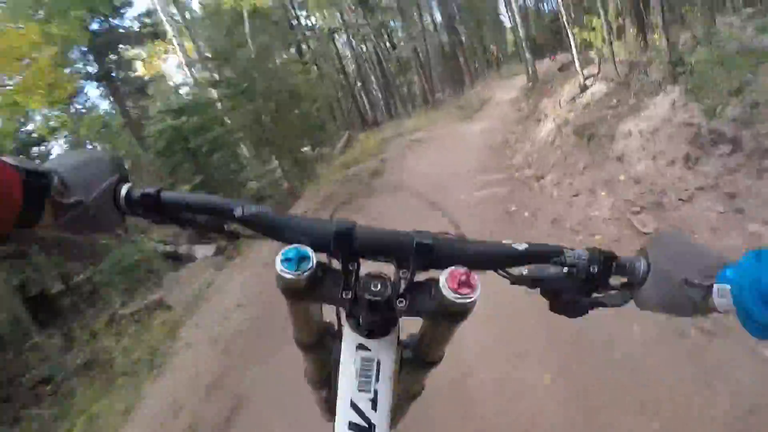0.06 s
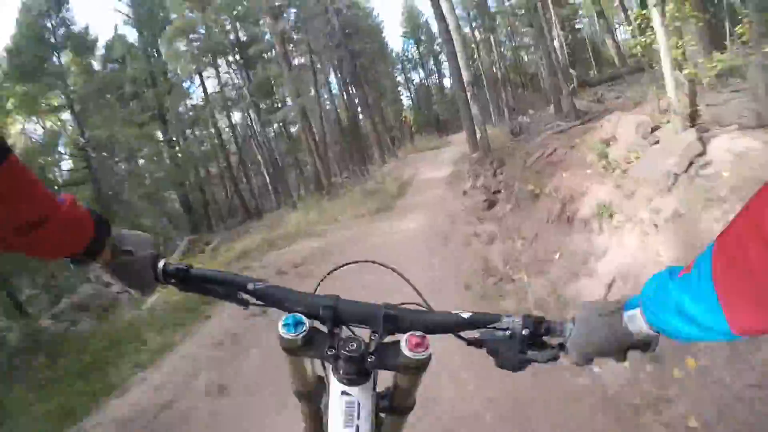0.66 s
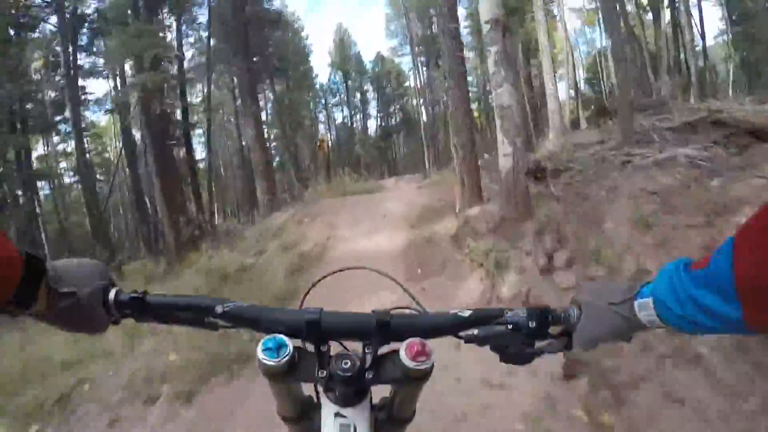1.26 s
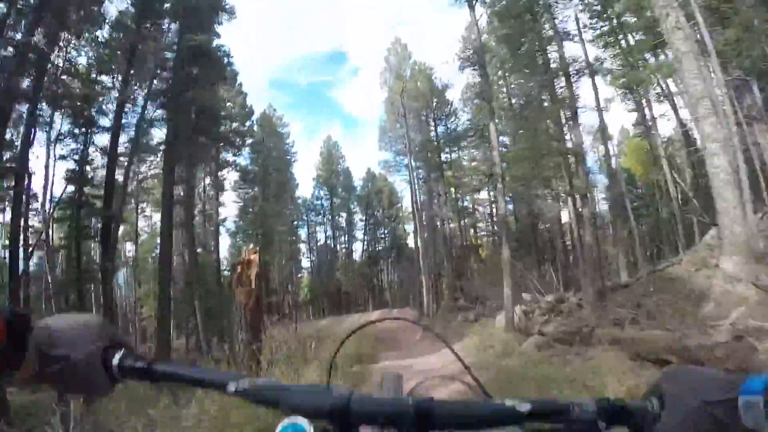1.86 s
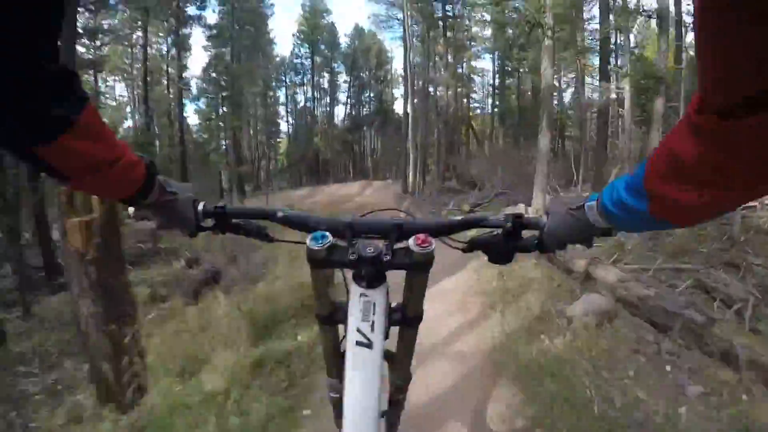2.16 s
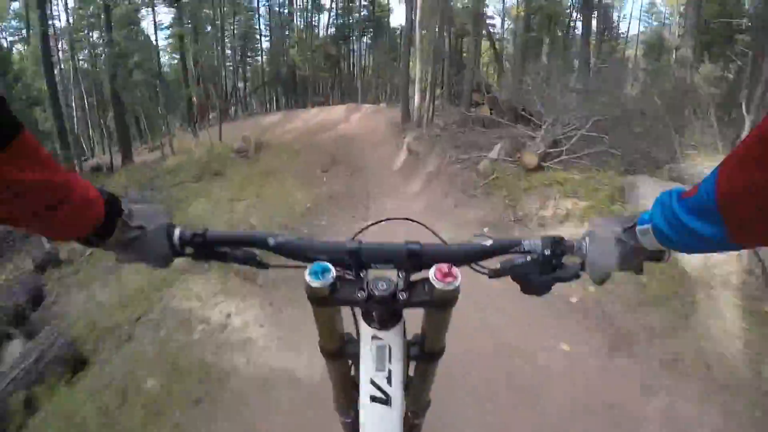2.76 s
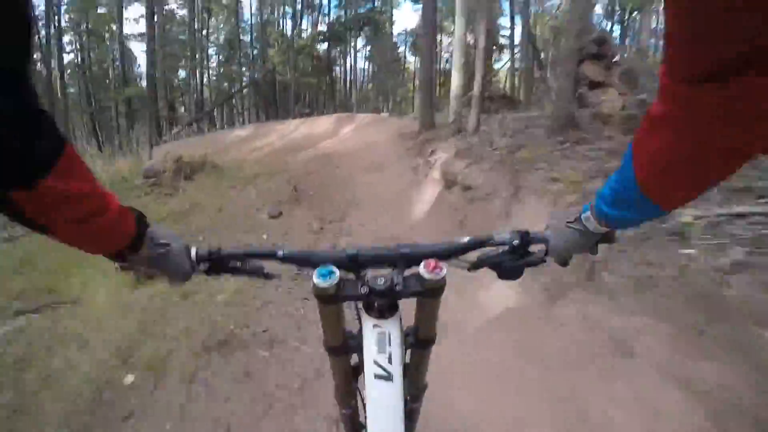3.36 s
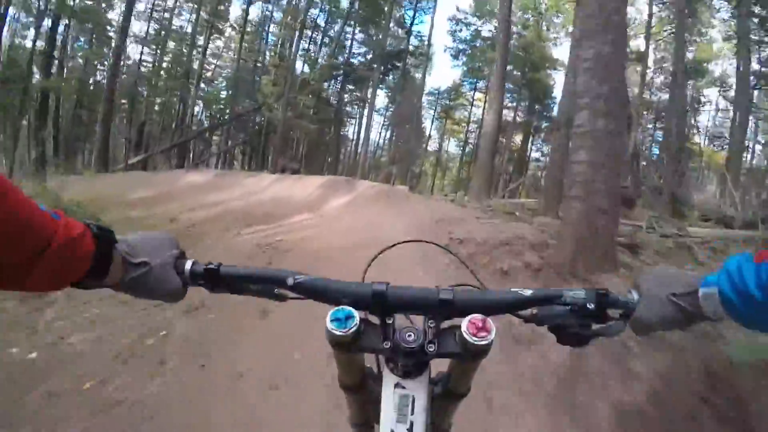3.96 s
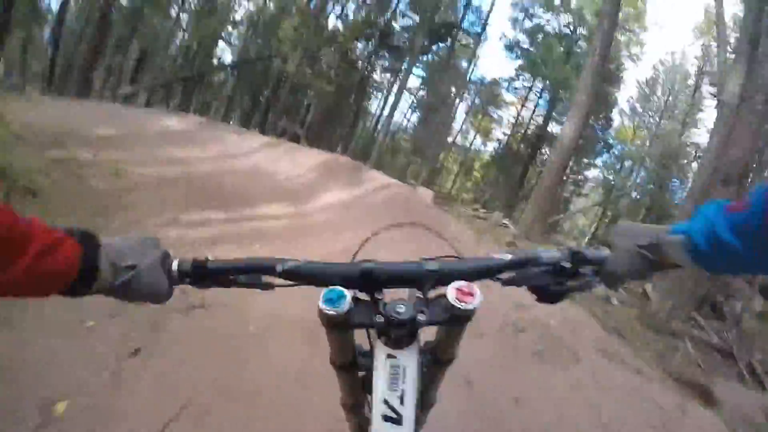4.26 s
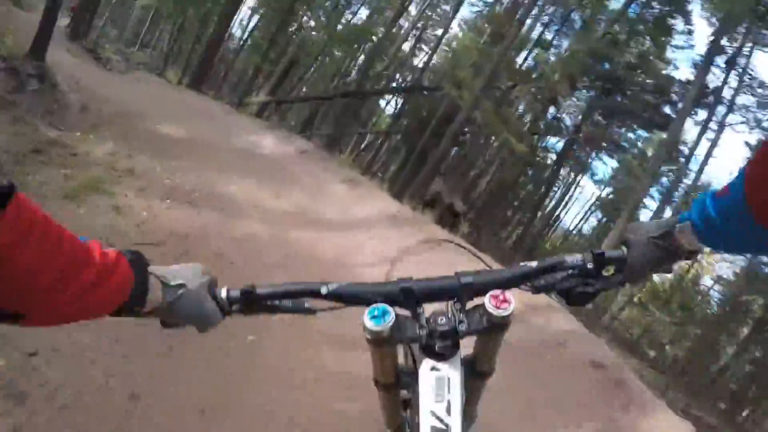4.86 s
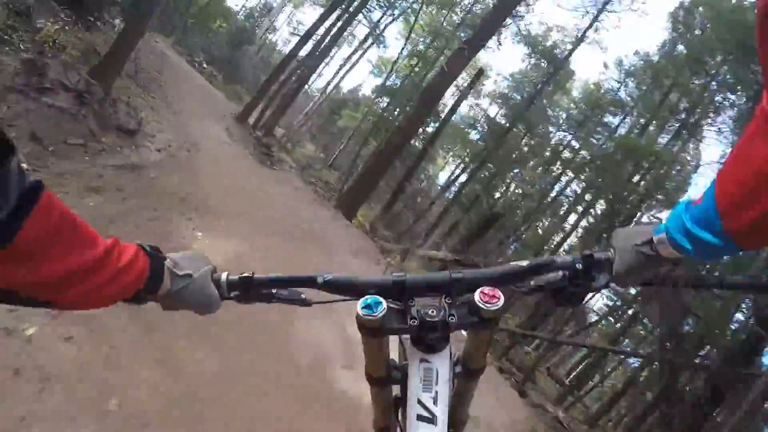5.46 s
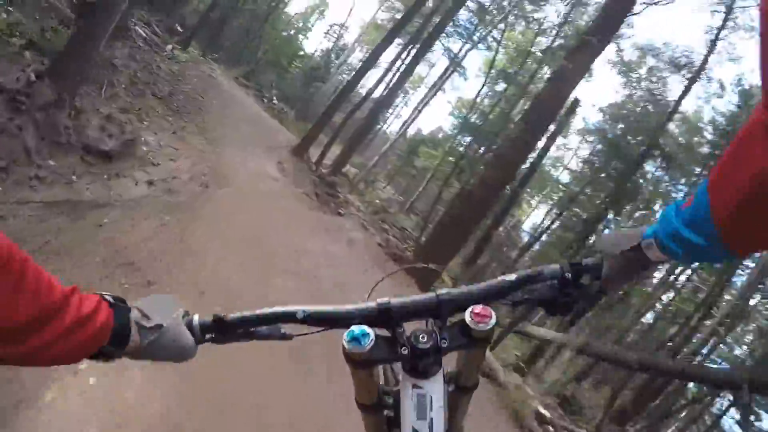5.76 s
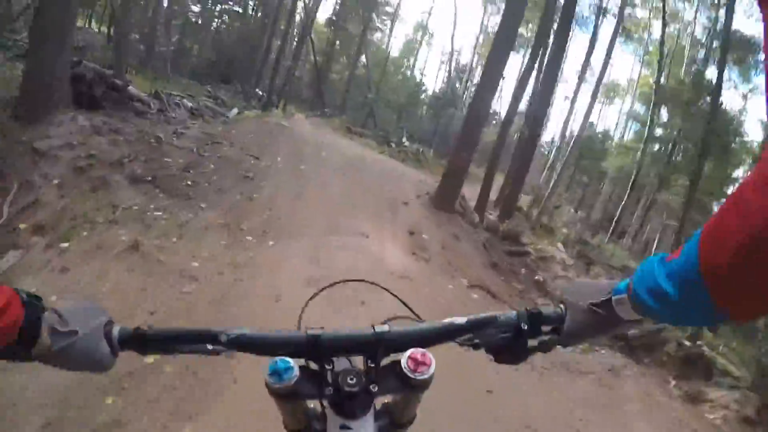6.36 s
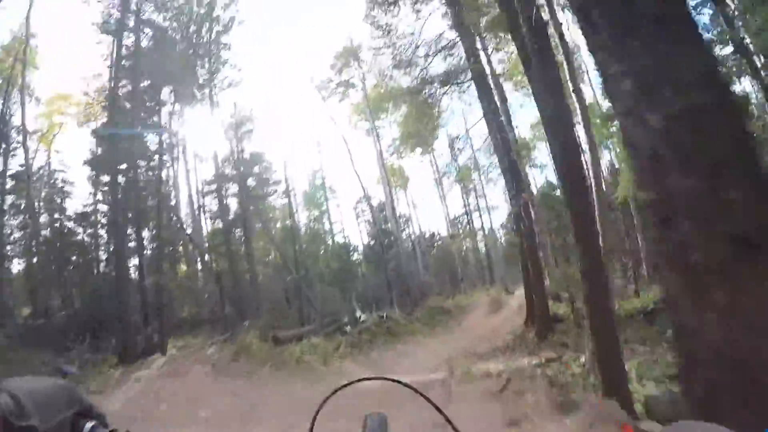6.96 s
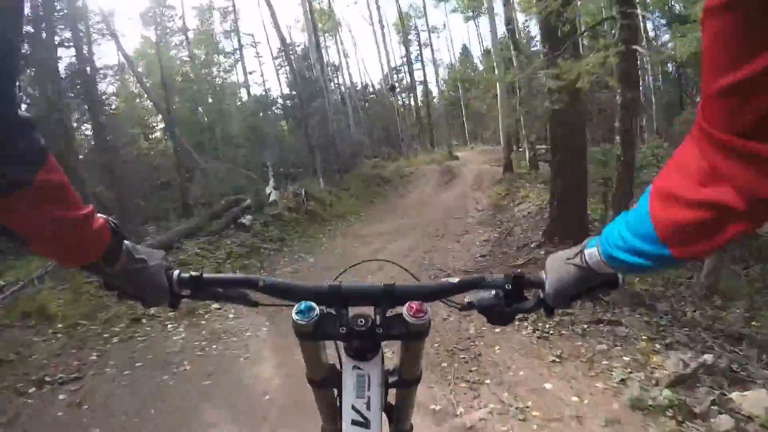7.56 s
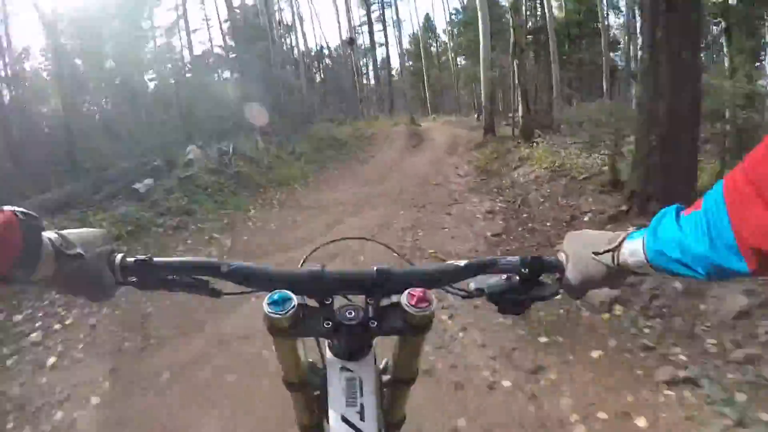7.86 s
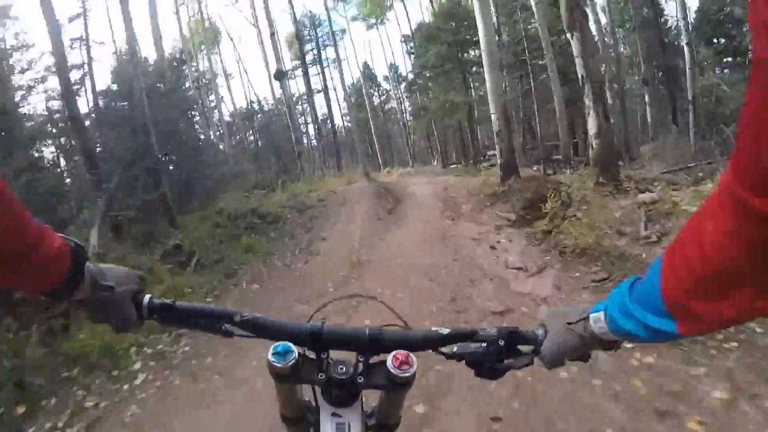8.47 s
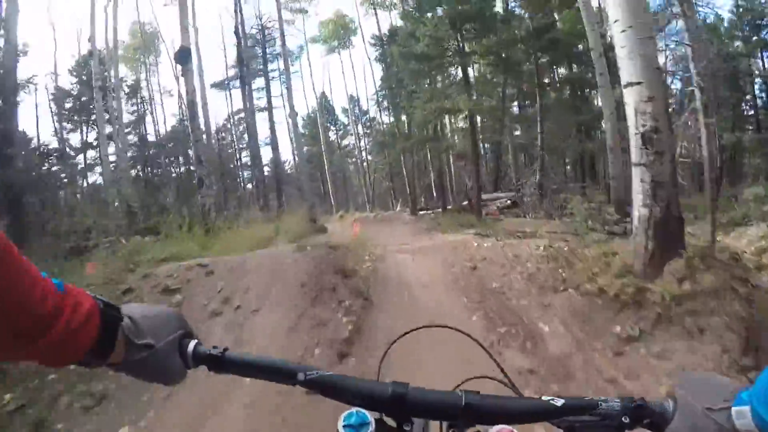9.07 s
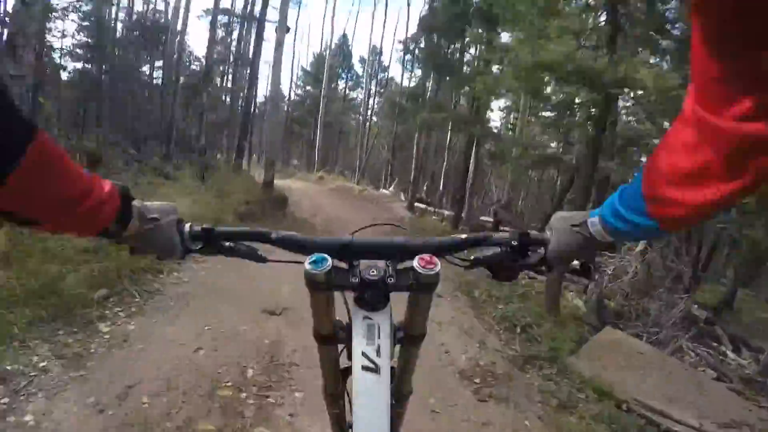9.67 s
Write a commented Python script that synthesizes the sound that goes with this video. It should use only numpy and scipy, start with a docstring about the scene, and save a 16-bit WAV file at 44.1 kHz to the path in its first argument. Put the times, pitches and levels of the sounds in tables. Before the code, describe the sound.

Low wind rumble buffets a chest-worn microphone while bike tyres roll over packed dirt and sand. Chain slaps and flicked stones come thickly at first. After a short airborne lull, a loud knock and thud hit, followed a couple of seconds later by another sharp crack. The gritty rolling carries on with scattered clacks, soft thuds and one more quiet jump and landing.

```python
"""Mountain bike on a dirt trail, from a chest camera.

Tyres crunch over grit and fall quiet in the jumps; wind and body shake rumble in the bass.
Chain and cables clack, stones tick and wheels knock over soft low thuds and swells of rumble.
Two hard blows ring the camera case and overload the camera."""
import sys
import numpy as np
from scipy import signal
from scipy.fft import rfft, irfft, next_fast_len
from scipy.io import wavfile
from scipy.ndimage import uniform_filter1d

SR = 44100
rng = np.random.default_rng(int(sys.argv[2]) if len(sys.argv) > 2 else 0)


def master_out(mix):
    """Clip the mix to full scale and print it as 16-bit PCM to the path in sys.argv[1]."""
    frames = np.transpose(np.atleast_2d(mix))
    ceiling = np.clip(frames, -1, 1)
    pcm = np.round(ceiling * 32767).astype(np.int16)
    wavfile.write(sys.argv[1], SR, pcm)


N = 428652
T = np.arange(N) / SR
AGE = np.arange(SR // 5) / SR  # s since a blow

# ground under the tyres: t/s, grit/dB, sand/dB
GROUND = [(0, -37.5, -44), (.22, -49.5, -62.5), (.6, -46.5, -61), (1.04, -44, -49.5), (1.27, -47, -59.5),
          (1.85, -50.5, -65.5), (2.6, -47, -60), (3.12, -49.5, -66), (3.52, -41.5, -51), (3.85, -50.5, -67),
          (4.2, -48, -56.5), (4.37, -49.5, -67), (4.7, -49.5, -63), (5.07, -43, -56.5), (5.28, -54, -69),
          (5.85, -53.5, -65), (6.15, -49, -62.5), (6.7, -50, -67), (7.25, -54, -71), (7.85, -47, -65),
          (8.1, -48, -65), (8.65, -52.5, -63.5), (9.35, -55, -79), (9.72, -47.5, -64)]
# tyres bite at a bump or turn: t/s, length/s, crunch/dB, roll/dB
BITES = [(0, .1, -43.5, -50), (0.34, 0.057, -45.5, -54.5), (0.454, 0.028, -36, -46),
         (0.746, 0.042, -40, -44.5), (0.87, 0.21, -42.5, -51.5), (1.456, 0.052, -42, -47),
         (1.698, 0.042, -39, -44.5), (1.89, 0.088, -43.5, -53.5), (2.001, 0.086, -45.5, -53),
         (2.398, 0.18, -42.5, -56), (2.56, 0.15, -41, -52), (2.764, 0.064, -44.5, -50.5),
         (2.983, 0.063, -45.5, -49), (3.18, 0.066, -41.5, -51), (3.442, .12, -40, -50),
         (3.644, 0.058, -39, -47.5), (3.9, .08, -47.5, -57), (4.16, 0.14, -40, -49.5),
         (4.43, .07, -40.5, -52.5), (4.556, 0.056, -43.5, -56), (4.727, 0.07, -43.5, -49.5),
         (5.34, 0.037, -44, -55.5), (5.477, 0.058, -46.5, -61), (5.976, 0.068, -45.5, -59),
         (6.21, 0.1, -48, -57.5), (6.623, 0.06, -46.5, -57), (6.83, 0.14, -41.5, -50.5),
         (7.089, 0.046, -47.5, -55), (7.171, 0.19, -51, -58), (7.736, .1, -40, -49.5),
         (8.24, .06, -46, -52), (8.524, 0.089, -44, -53.5), (8.679, 0.088, -47, -59),
         (9.275, .07, -43.5, -51), (9.404, 0.034, -45, -51.5)]
# spectra of hollow roll, grit and sand: f/Hz, level/dB
ROLL_SPECTRUM = [(120, -2.5), (260, -6), (470, -8.5), (640, 3), (850, 1), (1100, 6.5), (1350, 2),
                 (2200, -15)]
GRIT_SPECTRUM = [(600, -10.5), (1300, -15.5), (1750, -2), (2050, 0), (2480, -1.5), (2900, 0), (3400, -5),
                 (4000, -15), (4900, -21.5), (6500, -25.5)]
SAND_SPECTRUM = [(2500, -22), (4200, 4.5), (5200, -14.5), (6200, -9.5), (7000, -22.5), (9000, -15.5),
                 (12000, -17.5), (15000, -20.5)]
ROLL_DB, USUAL_GRIT_DB = -58, -45
FLUTTER_DB, FLUTTER_HZ = 2.08, 60


def tyres(jump_gain):
    """Knobs drum on packed dirt, crush grit and spray sand, fluttering with the wheel load."""
    grit, sand = gains(GROUND)
    crunch = grit * jump_gain
    roll = undb(ROLL_DB) * np.sqrt(grit / undb(USUAL_GRIT_DB)) * jump_gain
    for t, length_s, crunch_db, roll_db in BITES:
        bite = gate(t, t + length_s, attack_s=.037, release_s=.042)
        crunch = np.maximum(crunch, undb(crunch_db) * bite)
        roll = np.maximum(roll, undb(roll_db) * bite)
    sand = np.hypot(sand * jump_gain, undb(-25.5) * crunch)
    load = undb(FLUTTER_DB * drift(FLUTTER_HZ))
    drumming = unit(colour(grains(per_s=750, spread_db=2.5, smear_s=.0016), ROLL_SPECTRUM))
    crushing = unit(colour(grains(per_s=900, spread_db=3.5, smear_s=.004), GRIT_SPECTRUM))
    spray = undb(-1) * unit(colour(grains(per_s=910, spread_db=3.5, smear_s=.0018), SAND_SPECTRUM))
    pebbles = undb(-1.5) * unit(band(grains(per_s=45, spread_db=2.5, smear_s=.0011), 3700, octaves=1.1))
    return load * (roll * drumming + crunch * crushing + sand * spray) + sand * pebbles


# jumps and crests: take-off/s, landing/s, tyre gain/dB, buffet gain/dB
AIRTIME = [(2.095, 2.41, -8.5, -15.5), (2.696, 2.969, -5.5, -11.5), (7.31, 7.674, -7.5, -12.5),
           (8.867, 9.244, -2, 0.5)]
LIFT_S = .079


def jumps():
    """Gains of tyre noise and wind buffeting as the wheels unload and land."""
    tyre_db, buffet_db = 0, 0
    for takeoff_s, landing_s, tyre_step_db, buffet_step_db in AIRTIME:
        aloft = gate(takeoff_s, landing_s, LIFT_S, LIFT_S)
        tyre_db += tyre_step_db * aloft
        buffet_db += buffet_step_db * aloft
    return undb(tyre_db), undb(buffet_db)


# rush of air: t/s, level/dB
AIRFLOW = [(0, -17), (.25, -28.5), (.58, -17), (1.2, -18.5), (1.68, -21), (1.9, -27), (2.5, -21.5),
           (3.05, -27), (3.5, -17), (3.76, -20), (3.92, -33.5), (4.22, -18.5), (4.6, -23.5), (4.88, -15),
           (5.25, -18.5), (5.85, -21.5), (6.38, -30.5), (6.8, -20), (7.15, -26.5), (7.6, -29.5),
           (7.88, -16.5), (8.15, -27.5), (8.7, -24.5), (9.6, -35)]
# bumps shaking the rider: t/s, level/dB
BUMPS = [(0.059, -33), (0.169, -43), (0.491, -33), (0.552, -29), (.73, -35.5), (0.832, -29.5), (1.0, -28.5),
         (1.14, -41), (1.23, -52), (1.33, -44), (1.422, -28), (1.49, -35), (1.91, -38), (2.439, -29),
         (3.02, -37.5), (3.182, -29), (3.361, -33.5), (3.52, -40), (3.632, -31), (4.17, -34),
         (4.269, -27.5), (4.55, -35), (4.719, -32), (4.87, -32), (5.05, -35), (5.13, -30.5), (5.37, -51),
         (5.47, -36), (5.979, -34.5), (6.22, -37), (6.68, -41), (6.97, -40), (7.752, -23.5), (7.94, -43),
         (8.28, -36), (8.41, -54), (8.55, -36), (8.63, -33), (8.981, -36), (9.69, -30.5)]
# spectra of rumble and shudder: f/Hz, level/dB
RUMBLE_SPECTRUM = [(6, -32.5), (12, -5), (22, 10.5), (30, 4), (38, -5.5), (50, -9.5), (75, -27), (110, -48)]
SHUDDER_SPECTRUM = [(35, -14), (62, 3.5), (85, -1.5), (125, -10), (170, -19), (260, -26.5), (420, -35.5)]
BUMP_ATTACK_S, BUMP_DECAY_S, HEAVE_DB = .016, .032, 15
SHUDDER_DB, USUAL_AIR_DB = -47, -22.5
GUST_DB, GUST_HZ = 2, 14


def wind_and_shake(jump_gain):
    """Gusty air buffets the camera; each bump adds a shudder and a slow heave."""
    air, = gains(AIRFLOW)
    jolt = np.minimum(AGE / BUMP_ATTACK_S, 1) * np.exp(-AGE / BUMP_DECAY_S)
    shake = np.zeros(N)
    for t, db in BUMPS:
        add(shake, t, jolt, db)
    buffet = jump_gain * undb(GUST_DB * drift(GUST_HZ))
    rumble = np.hypot(air * buffet, undb(HEAVE_DB) * shake) * eddies(RUMBLE_SPECTRUM, hold_s=.06)
    tremor = undb(SHUDDER_DB) * np.sqrt(air / undb(USUAL_AIR_DB)) * buffet ** .2
    shudder = np.hypot(tremor, shake) * eddies(SHUDDER_SPECTRUM, hold_s=.05)
    return undb(3.2) * rumble + undb(1) * shudder


# slaps on the frame: t/s, level/dB, f/Hz
CHAIN_SLAPS = [(0.0558, -18, 2760), (0.3272, -20, 2060), (0.711, -22.5, 2110), (0.761, -21.5, 1940),
               (0.8582, -27, 2710), (0.8752, -16, 2350), (0.9422, -22.5, 2270), (0.9971, -16.5, 2860),
               (1.0588, -12.5, 2400), (1.1127, -19.5, 2460), (1.436, -4, 2180), (1.47, -19, 1900),
               (1.5904, -28.5, 2340), (1.707, -28, 1900), (2.4306, -18.5, 2330), (2.5028, -19.5, 2040),
               (3.5053, -10.5, 2400), (3.5746, -16.5, 2110), (3.646, -19.5, 2000), (4.9721, -26.5, 2290),
               (6.2658, -15.5, 2180), (6.9378, -25.5, 2400), (7.7175, -24.5, 2260), (7.992, -20, 2170),
               (8.0717, -23, 2350), (8.3552, -23.5, 2310)]


def chain():
    """Chain and cables slap the frame; the camera case rings faintly."""
    out = np.zeros(N)
    for t, db, hz in CHAIN_SLAPS:
        force = contact(decay_s=.0013, tail_db=-27, tail_s=.0044)
        slap = band(force, 1.005 * hz, octaves=.68) + undb(-37) * force
        clack = band(slap, 2900, octaves=2.2, order=1)
        add(out, t, case_ring(clack, ring_db=-38), db)
    return out


# flicked stones: t/s, level/dB, f/Hz
STONE_TICKS = [(0.099, -33, 2880), (0.233, -31.5, 2560), (0.3747, -24.5, 3440), (0.3876, -23.5, 2870),
               (0.5594, -24, 2640), (0.5916, -28, 3030), (0.627, -25.5, 2630), (0.6707, -29, 2920),
               (0.746, -25.5, 2630), (0.9087, -22, 3130), (1.0273, -25, 2780), (2.406, -33, 3560),
               (2.416, -31.5, 4500), (2.4508, -24, 3200), (2.4692, -24.5, 2620), (2.4837, -24.5, 3430),
               (2.735, -36, 2550), (2.8377, -36.5, 2820), (3.4212, -28.5, 2600), (3.5285, -25.5, 3470),
               (4.578, -31.5, 3400), (4.911, -30.5, 2800), (5.521, -32, 3200), (6.7165, -37.5, 3200),
               (7.722, -35, 4130), (7.805, -33.5, 3250), (8.0457, -29, 2450), (8.4457, -30.5, 2410),
               (8.6847, -24, 2700), (8.726, -27.5, 2730)]


def stones():
    """Stones tick as the tyres flick them away."""
    out = np.zeros(N)
    for t, db, hz in STONE_TICKS:
        force = contact(decay_s=.0044, tail_db=-22, tail_s=.012)
        tick = band(force, hz, octaves=.72, order=1)
        add(out, t, band(tick, 2500, octaves=1.25, order=1), db)
    return out


# wheel and frame knocks: t/s, level/dB, f/Hz
WHEEL_KNOCKS = [(1.005, -36, 780), (1.48, -29, 626), (2.513, -28, 647), (2.570, -16, 950),
                (2.5766, -2, 1515), (2.602, -26.5, 805), (2.633, -27, 1010), (2.669, -31.5, 640),
                (3.449, -33, 650), (4.248, -11.5, 704), (4.561, -45, 450), (4.717, -34.5, 555),
                (4.832, -31, 1000), (5.1402, -12.5, 890), (5.947, -30, 840), (6.263, -23, 1080),
                (6.936, -29.5, 970), (7.758, -36, 500)]


def wheels():
    """Wheels and frame knock dully; the camera case rings faintly."""
    out = np.zeros(N)
    for t, db, hz in WHEEL_KNOCKS:
        force = contact(decay_s=.0015, tail_db=-30.5, tail_s=.011)
        add(out, t, case_ring(band(force, hz, octaves=.96), ring_db=-41), db)
    return out


# low thuds and swells: t/s, level/dB, f/Hz, t60/s
LOW_THUDS = [(1.005, -28.5, 136, 0.12), (1.480, -22.5, 116, 0.014), (2.31, -16.5, 45.4, 0.19),
             (2.571, 2, 48.9, 0.095), (2.575, -14.5, 202, 0.038), (3.449, -13, 66, 0.053),
             (3.454, -27, 140, 0.13), (4.248, -16.5, 122, 0.056), (4.248, -19, 297, .02),
             (4.421, -21, 57.6, .08), (4.556, -29.5, 147, 0.037), (4.722, -12, 97, 0.035),
             (5.835, -21.5, 59, 0.15), (6.534, -17, 53, 0.21), (7.239, -21, 52.5, 0.18),
             (7.594, -19, 47.7, 0.36), (7.757, -32.5, 118, 0.022), (8.645, -30, 74, 0.1),
             (8.992, -22.5, 58.7, 0.2), (9.329, -34.5, 61, 0.12)]


def low_thuds():
    """Soft low thuds and brief swells of rumble, each rising over about a third of a cycle."""
    out = np.zeros(N)
    for t, db, hz, t60_s in LOW_THUDS:
        onset = 1 - np.exp(-(AGE * hz / .3) ** 2)
        add(out, t, -damped_sine(hz, t60_s) * onset, db)
    return out


# blows on the case: t/s, level/dB, f/Hz, width/octaves, ring/dB, bright edge/dB
CASE_BLOWS = [(2.5778, 4.5, 2104, 0.38, -48, -49.5), (4.2474, 7.5, 2620, 1.14, -41, -22)]


def case_blows():
    """The hardest jolts strike the camera case with a crack."""
    out = np.zeros(N)
    for t, db, hz, octaves, ring_db, edge_db in CASE_BLOWS:
        force = contact(decay_s=.0015, tail_db=-38, tail_s=.004)
        crack = band(force, hz, octaves) + undb(edge_db) * force
        add(out, t, case_ring(crack, ring_db), db)
    return out


# modes of the camera case: f/Hz, level/dB, t60/s
SHELL_MODES = [(615, -3, .085), (1130, -14, .025), (1665, -6, .025), (2094, -10, .05), (2240, -1, .035),
               (3280, -3, .02), (3730, -9, .022), (4506, -22, .06), (5259, -16, .045), (6060, -11, .045)]


def case_ring(blow, ring_db):
    """A blow plus the case modes, each driven by the energy near its frequency."""
    power = np.abs(rfft(blow)) ** 2
    bin_hz = np.arange(len(power)) * SR / len(blow)
    ring = 0
    for hz, db, t60_s in SHELL_MODES:
        nearby = np.exp(-((bin_hz - hz) / 300) ** 2)
        drive = np.sqrt(np.average(power, weights=nearby))
        ring += drive * undb(db) * damped_sine(hz, t60_s)
    return blow + undb(ring_db) * ring


# air resonances in the case: f/Hz, width/Hz, gain/dB
AIR_MODES = [(2282, 83, 5.5), (3290, 110, 3), (3716, 140, 4), (4905, 94, 7), (5900, 300, 3.5),
             (7430, 140, 4), (8350, 440, -0.5)]


def case_air(x):
    """The air in the case resonates and colours the sound."""
    for hz, width_hz, db in AIR_MODES:
        resonance = signal.lfilter(*signal.iirpeak(hz, hz / width_hz, fs=SR), x)
        x = x + (undb(db) - 1) * resonance
    return x


# microphone hiss: f/Hz, level/dB
HISS_SPECTRUM = [(1000, -6.5), (3000, 11.5), (6000, 1.5), (8000, -3.5), (11000, -2), (13700, -3),
                 (14500, -0.5), (15200, -13)]


def hiss():
    """Faint, steady microphone noise."""
    return undb(-65.5) * unit(colour(rng.standard_normal(N), HISS_SPECTRUM))


def grains(per_s, spread_db, smear_s):
    """Crushed dirt: tiny noise bursts, many small, a few large."""
    sizes = undb(spread_db * np.minimum(rng.exponential(size=N), 5))
    energy = (rng.random(N) < per_s / SR) * sizes ** 2
    return unit(rng.standard_normal(N) * np.sqrt(leaky_sum(energy, smear_s)))


def eddies(spectrum, hold_s):
    """Low swaying pressure, its strength evened out over hold_s."""
    sway = colour(rng.standard_normal(N), spectrum)
    power = np.abs(signal.hilbert(sway, next_fast_len(N))[:N]) ** 2
    return unit(sway / np.sqrt(uniform_filter1d(power, int(hold_s * SR) + 1)))


def contact(decay_s, tail_db, tail_s):
    """Rough contact: a noisy force builds, dies quickly and leaves a faint rattle."""
    force = rng.choice([-1, 1], len(AGE)) * (1 - np.exp(-AGE / .00099))
    return force * (np.exp(-AGE / decay_s) + undb(tail_db) * np.exp(-AGE / tail_s))


def damped_sine(hz, t60_s):
    """One mode, falling 60 dB in t60_s."""
    return np.sin(2 * np.pi * hz * AGE) * undb(-60 * AGE / t60_s)


def drift(rate_hz):
    """Smooth random drift, rms 1."""
    step = int(SR / rate_hz)
    return unit(uniform_filter1d(rng.standard_normal(N)[np.arange(N) // step], step))


def colour(x, spectrum):
    """Minimum-phase filter through (Hz, dB) points, falling away above the last."""
    size = 2 * next_fast_len(len(x) // 2 + 4096)
    hz, db = np.transpose(spectrum)
    bin_hz = np.maximum(np.arange(size // 2 + 1) * SR / size, 1)
    rolloff = np.minimum(hz[-1] / bin_hz, 1) ** 3
    gain = undb(np.interp(np.log(bin_hz), np.log(hz), db)) * rolloff
    cepstrum = irfft(np.log(gain))
    cepstrum[1:size // 2] *= 2
    cepstrum[size // 2 + 1:] = 0
    return irfft(rfft(x, size) * np.exp(rfft(cepstrum)))[:len(x)]


def band(x, hz, octaves, order=2):
    """Band-pass centred on hz."""
    ratio = 2 ** (octaves / 2)
    return signal.sosfilt(signal.butter(order, [hz / ratio, hz * ratio], "band", fs=SR, output="sos"), x)


def leaky_sum(x, decay_s):
    """Running sum with exponential decay."""
    return signal.lfilter([1], [1, -np.exp(-1 / (decay_s * SR))], x)


def gate(start_s, end_s, attack_s, release_s):
    """Trapezoid with ramps centred on start and end."""
    return np.clip(np.minimum((T - start_s) / attack_s, (end_s - T) / release_s) + .5, 0, 1)


def gains(table):
    """The dB columns of a time curve as gains per sample."""
    t, *columns = np.transpose(table)
    return [undb(np.interp(T, t, db)) for db in columns]


def add(out, t, sound, peak_db):
    """Mix a sound in at t seconds."""
    i = int(t * SR)
    out[i:i + len(sound)] += (undb(peak_db) * sound / np.abs(sound).max())[:N - i]


def undb(db):
    """Decibels to gain."""
    return 10 ** (np.asarray(db) / 20)


def unit(x):
    """Scale to rms 1."""
    return x / np.sqrt(np.mean(x ** 2))


def scene():
    """Everything reaches one microphone through the air in the camera case."""
    tyre_gain, buffet_gain = jumps()
    ride = wind_and_shake(buffet_gain) + tyres(tyre_gain)
    impacts = chain() + stones() + wheels() + low_thuds() + case_blows()
    return case_air(ride + impacts + hiss())[None]


DUCK_DB, DUCK_ATTACK_S, DUCK_RECOVERY_S = -5, .015, .3
LOWPASS_HZ = 15600


def record(dry):
    """The camera clips near full scale; after an overload its gain ducks and slowly recovers."""
    overload_s = leaky_sum(np.abs(dry) > 1.15, DUCK_RECOVERY_S) / SR
    target_db = DUCK_DB * np.tanh(overload_s / .001)
    attack = 1 / (DUCK_ATTACK_S * SR)
    gain = undb(signal.lfilter([attack], [1, attack - 1], target_db))
    clipped = np.clip(dry * gain, -.96, .96)
    return signal.sosfilt(signal.ellip(8, .2, 70, LOWPASS_HZ, fs=SR, output="sos"), clipped)


dry = scene()
out = record(dry)
master_out(out)
```